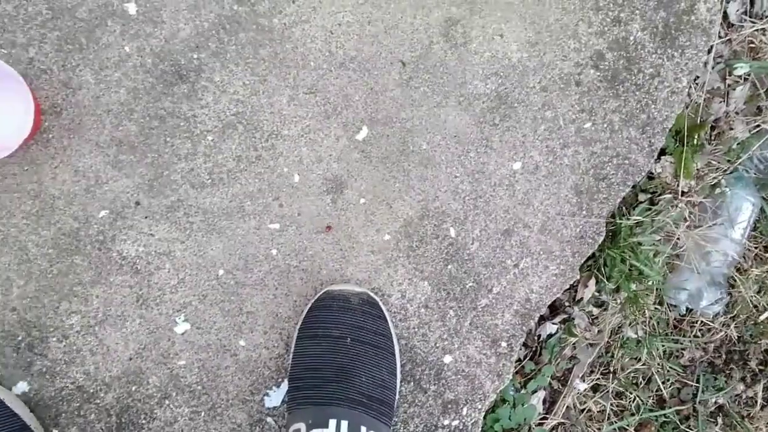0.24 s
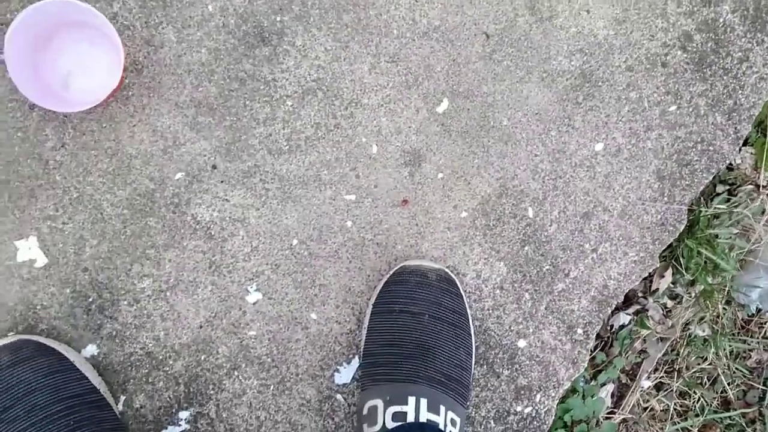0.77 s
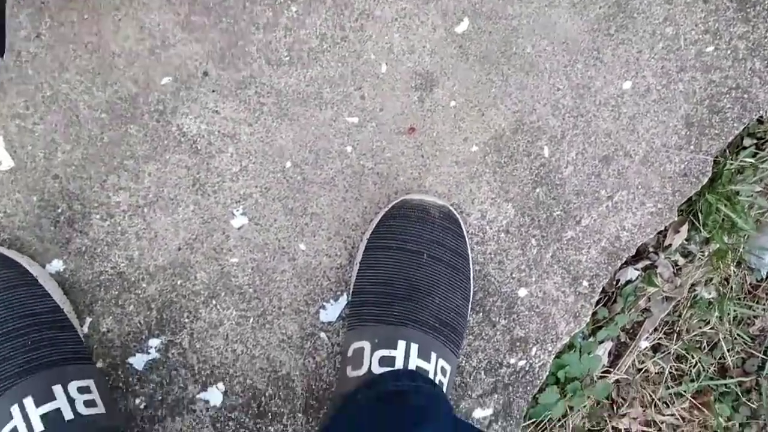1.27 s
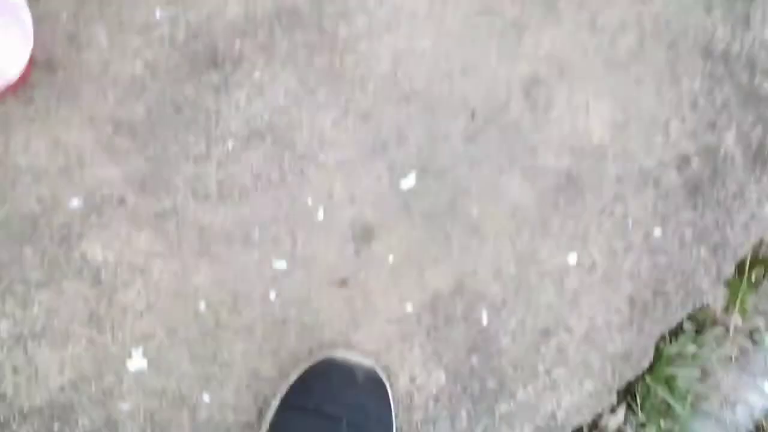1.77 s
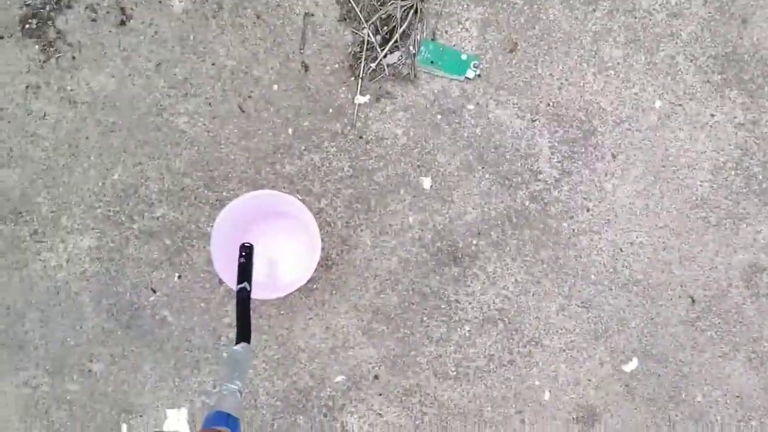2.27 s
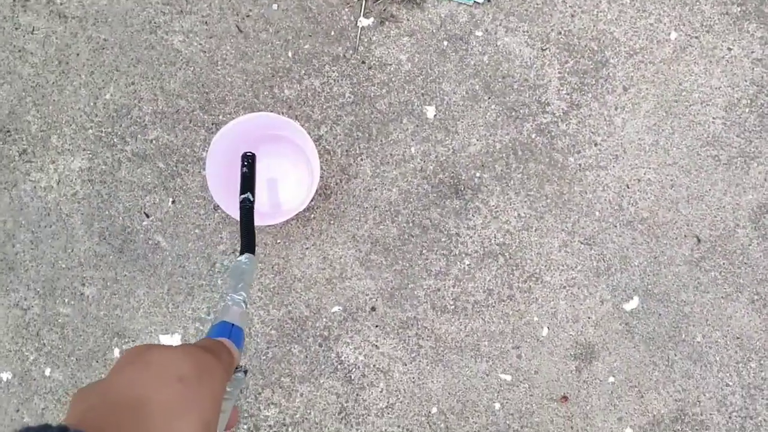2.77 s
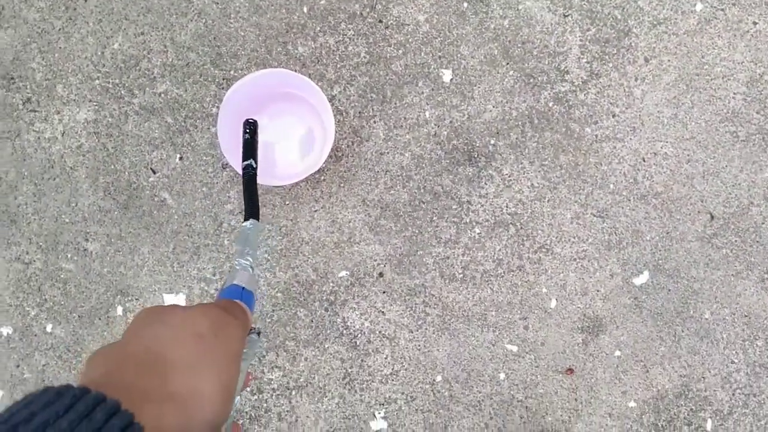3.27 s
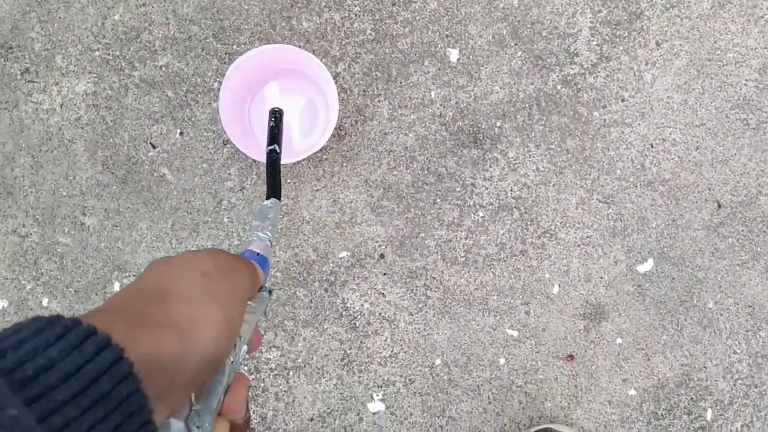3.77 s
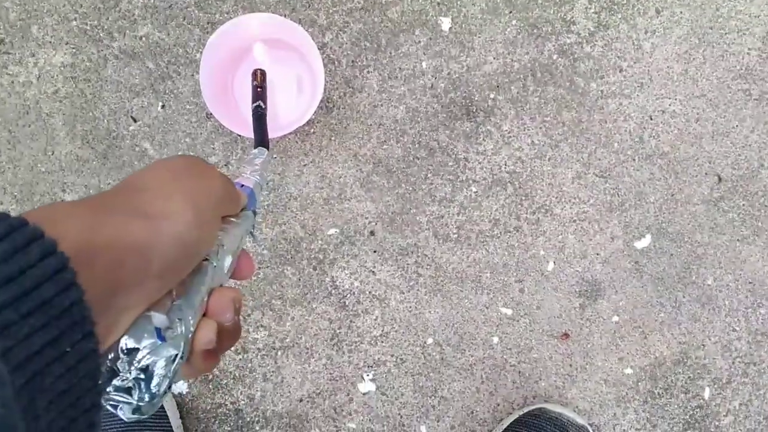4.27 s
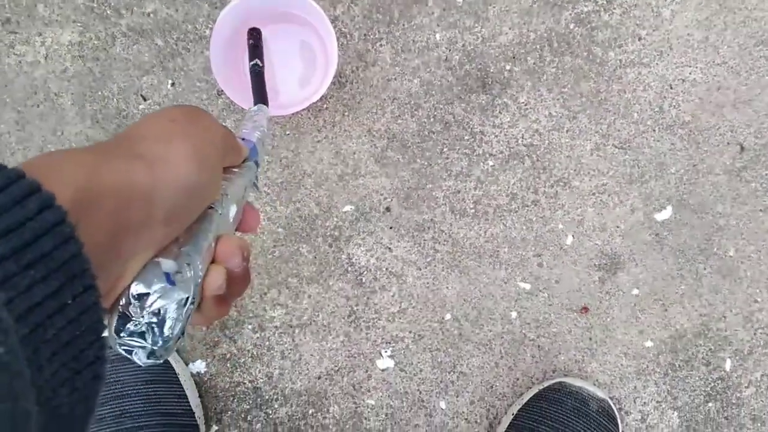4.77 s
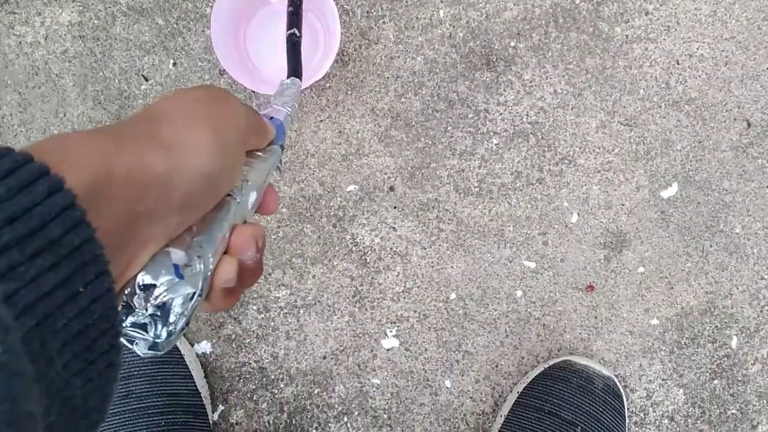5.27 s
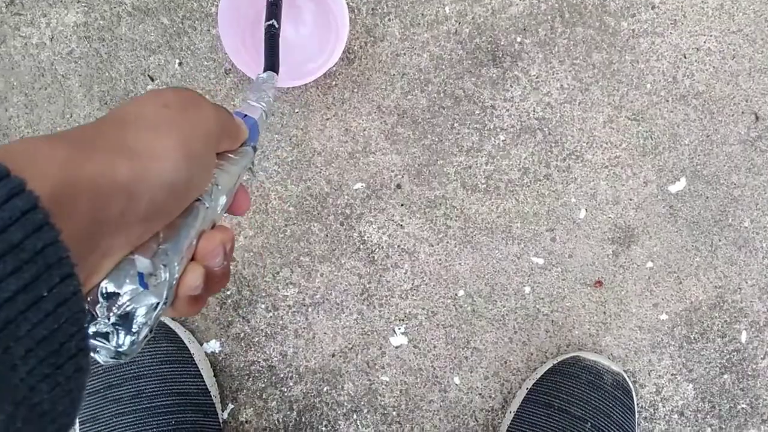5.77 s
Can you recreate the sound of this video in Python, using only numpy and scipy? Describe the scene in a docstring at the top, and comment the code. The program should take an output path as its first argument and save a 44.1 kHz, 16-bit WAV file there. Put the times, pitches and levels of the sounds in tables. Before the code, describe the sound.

A utility lighter clicks repeatedly up close with sharp plastic snaps, outdoors over a faint low rumble of distant traffic.

```python
"""Utility lighter in a concrete yard.

A long-nosed lighter is clicked close to a phone: the trigger creaks, the piezo hammer snaps and the
trigger springs back, each snap ringing the plastic case and jolting the hand. House walls echo.
Shoes shift on grit, a sleeve rustles, traffic swells and fades; faint thin high tones come and go.
The phone's limiter flattens the first instant of the loudest snaps."""
import sys
import numpy as np
from scipy import signal
from scipy.fft import rfft, irfft, next_fast_len
from scipy.io import wavfile
from scipy.ndimage import uniform_filter1d, minimum_filter1d, map_coordinates

SR = 44100
rng = np.random.default_rng(int(sys.argv[2]) if len(sys.argv) > 2 else 0)


def int16_out(signal):
    """Quantize to a 16-bit WAV file."""
    q = np.round(np.clip(np.atleast_2d(signal).T, -1, 1) * 32767)
    wavfile.write(sys.argv[1], SR, q.astype(np.int16))


N = 265923

# Far tyre hum. Each row: time in seconds, relative level in dB.
TYRE_LEVELS = [(0.0, -62.5), (0.32, -61.5), (0.91, -54.5), (1.61, -61), (2.2, -60), (2.54, -64.5),
               (3.04, -61.5), (3.27, -65.5), (3.56, -62), (3.78, -62), (4.55, -70), (5.27, -71),
               (5.48, -61), (5.61, -59.5), (6.03, -65)]
# Passing vehicles. Each row: time when nearest and half length in seconds, rumble, roar and wash in dB.
VEHICLE_PASSES = [(.97, .6, -47, -49.5, -56.5), (2.049, 0.35, -49.5, -53, -64),
                  (2.93, 0.85, -57.5, -61.5, -59), (5.68, .42, -51.5, -84, -77)]
# Traffic and background hiss spectra. Each row: frequency in Hz, relative density in dB.
TYRE_SPECTRUM = [(400, -39), (620, -24.5), (780, 2), (900, 5.5), (1040, 0.5), (1200, -11.5), (1450, -23),
                 (2500, -47.5), (6000, -89.5)]
RUMBLE_SPECTRUM = [(20, -12), (35, -15.5), (50, -8), (72, 0.5), (130, -0.5), (200, -3.5), (300, -9),
                   (380, -22), (470, -41), (900, -62.5), (4000, -100)]
ROAR_SPECTRUM = [(150, -11.5), (300, 1.5), (450, -0.5), (650, -1.5), (900, -6.5), (1300, -12.5),
                 (2500, -47.5), (6000, -92.5)]
WASH_SPECTRUM = [(500, -29), (900, -1), (1350, 1.5), (1750, -2), (2100, -7.5), (2900, -12.5), (3600, -29),
                 (7000, -32.5), (11000, -66.5)]
FLICKER_SPECTRUM = [(700, -24), (1300, 1), (1900, -8.5), (3100, -10.5), (5000, -23), (9000, -23.5),
                    (12000, -41.5)]
HISS_SPECTRUM = [(100, 0), (3000, -4.5), (8500, 4.5), (10000, -1.5), (12500, -7), (13500, -16),
                 (16000, -16.5)]
# Grit under a shoe. Each row: start in seconds, level in dB, pitch in Hz, rattle time in seconds.
GRIT_CRACKS = [(0.0848, -63.5, 9600, 0.006), (.3022, -61, 8700, 0.003), (1.1298, -49, 7200, 0.0046),
               (1.261, -45.5, 7500, 0.0025), (5.5466, -41.5, 6940, 0.0041), (5.559, -36.5, 7100, 0.0013),
               (5.6263, -39.5, 7000, 0.0019), (5.634, -42, 6600, 0.0036), (5.8118, -38.5, 7520, 0.0018)]
# Stick-slip spectrum. Each row: ratio of frequency to pitch, relative density in dB.
SLIP_SPECTRUM = [(.1, -54), (.35, -23.5), (0.531, -9), (.8, -3), (1.098, 5), (1.3, -8), (1.5, -20.5),
                 (1.847, -34), (2.199, -54.5)]
# Wall reflections. Each row: delay in seconds, gain in dB.
WALL_ECHOES = [(0.0143, -22), (0.029, -34), (0.0425, -31.5), (0.0559, -32.5), (.0603, -36.5), (0.068, -41),
               (0.0855, -37.5)]
# Yard tail colour. Each row: frequency in Hz, relative level in dB.
TAIL_SPECTRUM = [(300, -5.5), (2000, 7), (5500, 2), (8100, -4), (10000, 1), (15000, 4.5)]
# Yard tail decay. Each row: frequency in Hz, T60 in seconds.
TAIL_T60 = [(200, 0.45), (1500, 0.53), (5000, .41), (8000, .48), (12000, 0.5), (16000, .38)]
# Sleeve rubbing. Each row: frequency in Hz, relative density in dB.
CLOTH_SPECTRUM = [(2000, -20), (4500, -6.5), (8000, 0.5), (9300, -3), (10500, -20), (14000, -38.5)]
# Hammer and trigger snaps. Each row: start in seconds, level in dB, relative ring, clack and jolt in dB.
LIGHTER_SNAPS = [(1.4928, -3, -2, -3, -19), (1.7778, -18, -5, -6, -18), (2.4213, -4.5, -7.5, 1, -33.5),
                 (2.4740, -5, -2, 0, -17), (2.9859, -13.5, -8.5, 0, -32),
                 (3.1139, -20.5, -3.5, -7.5, -20.5), (3.2521, -4, -1.5, -1.5, -18)]
# Crack of a snap. Each row: frequency in Hz, relative density in dB.
CRACK_SPECTRUM = [(100, -29.5), (400, -21.5), (1000, -20.5), (1400, -13), (2200, -19), (3200, -19),
                  (4200, -13), (5700, -5), (6800, -5), (8100, 4.5), (9200, -2), (10500, -14.5),
                  (12000, -25), (15500, -31.5)]
# Plastic clack, stronger in hard strikes. Each row: frequency in Hz, multiplier of the snap's clack dB.
CLACK_WEIGHTS = [(2500, 0.5), (4200, 1.5), (6000, 1.84), (7500, 1.5)]
# Case and steel nose modes. Each row: frequency in Hz, relative level in dB, T60 in seconds.
CASE_MODES = [(1424, -23, 0.024), (1720, -27.5, 0.022), (2860, -27, 0.025), (3980, -23.5, 0.022),
              (4800, -21.5, 0.015), (5619, -15.5, 0.029), (5740, -13.5, 0.018), (6790, -14.5, 0.0059),
              (7416, -9.5, 0.02), (8090, 0, 0.027), (8820, -3, .016), (8600, -9, 0.016), (9300, -18, 0.039),
              (9480, -22, 0.022)]
# Slips in a slow press. Each row: lead in seconds, level in dB re the snap, rattle time in seconds.
CREAK_SLIPS = [(.035, -18.5, 0.0029), (0.016, -21.5, 0.0049)]
# Loose trigger ticks. Each row: start in seconds, level in dB.
TRIGGER_TICKS = [(1.8934, -53.5), (1.9921, -40.5), (2.011, -51), (3.1652, -40.5)]
# Faint high tones. Each row: start and length in seconds, pitch in Hz, mid-swell level in dB.
FAINT_TONES = [(2.598, 0.48, 9020, -75), (3.762, 0.34, 9000, -84), (5.305, 0.43, 2983, -78)]


def amp(db):
    """Decibels to gain."""
    return 10 ** (np.asarray(db) / 20)


def unit(x):
    """Scale to rms 1."""
    return x / np.sqrt(np.mean(x ** 2) + 1e-20)


def along(points, hz):
    """Interpolate (Hz, value) points on a log axis."""
    knots_hz, values = np.transpose(points)
    return np.interp(np.log(hz + 1e-6), np.log(knots_hz), values)


def wobble(rate_hz, size=N):
    """Smooth random curve with knots at rate_hz."""
    knots = rng.standard_normal(int(size * rate_hz / SR) + 4)
    return map_coordinates(knots, [np.arange(size) * rate_hz / SR])


def add(track, start_s, sound):
    """Mix a sound into the track."""
    span = track[round(start_s * SR):][:len(sound)]
    span += sound[:len(span)]


def coloured(x, spectrum):
    """Minimum-phase filter from (Hz, dB) points."""
    n_fft = 2 * next_fast_len(len(x))
    gain = amp(along(spectrum, np.fft.rfftfreq(n_fft, 1 / SR)))
    cepstrum = irfft(np.log(gain), n_fft)
    cepstrum[1:n_fft // 2] *= 2
    cepstrum[n_fft // 2 + 1:] = 0
    return irfft(rfft(x, n_fft) * np.exp(rfft(cepstrum)), n_fft)[:len(x)]


def rush(spectrum, patchy_db):
    """Coloured noise with patches of random gain; rms 1."""
    bins = signal.stft(rng.standard_normal(N), nperseg=1024)[2]
    field = uniform_filter1d(rng.standard_normal(bins.shape), size=5, axis=0)
    field = uniform_filter1d(field, size=9, axis=1)
    noise = signal.istft(bins * amp(patchy_db * unit(field)))[1][:N]
    return unit(coloured(noise, spectrum))


def flutter(spectrum, depth_db):
    """Noise flickering in narrow, short-lived bands; rms 1."""
    bins = signal.stft(rng.standard_normal(N), nperseg=1024)[2]
    field = rng.standard_normal(bins.shape)
    for _ in range(2):
        field = uniform_filter1d(uniform_filter1d(field, size=3, axis=0), size=5, axis=1)
    gain_db = depth_db * 2 * np.tanh(unit(field) / 2)
    noise = signal.istft(bins * amp(gain_db))[1][:N]
    return unit(coloured(noise, spectrum))


def tyres():
    """Far tyres hum throughout."""
    road_db = np.interp(np.arange(N) / SR, *np.transpose(TYRE_LEVELS))
    return amp(road_db + 1) * flutter(TYRE_SPECTRUM, depth_db=3.5)


def flickering_hiss():
    """Faint hiss flickers in narrow, short-lived bands."""
    return amp(-80) * flutter(FLICKER_SPECTRUM, depth_db=16)


def vehicles():
    """Engine rumble, roar and road wash swell with each pass; treble fades first with distance."""
    nearest_s, half_s, rumble_db, roar_db, wash_db = np.transpose(VEHICLE_PASSES)[:, :, None]
    distance_sq = 1 + ((np.arange(N) / SR - nearest_s) / half_s) ** 2

    def swell(db, fall_db):
        return np.linalg.norm(amp(db - fall_db * np.log10(distance_sq)), axis=0)

    rumble_floor, roar_floor = amp(-52.5), amp(-82.5)
    rumble_gain = np.hypot(swell(rumble_db, fall_db=13.5), rumble_floor) * amp(1.207 * wobble(11))
    roar_gain = np.hypot(swell(roar_db, fall_db=36), roar_floor)
    rumble = rumble_gain * rush(RUMBLE_SPECTRUM, patchy_db=2)
    roar = roar_gain * rush(ROAR_SPECTRUM, patchy_db=2.5)
    wash = swell(wash_db, fall_db=62) * flutter(WASH_SPECTRUM, depth_db=6.5)
    return rumble + roar + wash


def chatter(t, rattle_s, t60_s, spectrum):
    """Parts rattle, then settle; total energy equals rms 1 over rattle_s."""
    contacts = rng.choice([-1, 1], len(t)) * amp(-60 * np.maximum(t - rattle_s, 0) / t60_s)
    burst = coloured(contacts, spectrum)
    return burst * np.sqrt(rattle_s * SR) / np.linalg.norm(burst)


def slips(events, t60_s):
    """Surfaces stick and slip in short ticks."""
    track, t = np.zeros(N), np.arange(SR // 20) / SR
    for start_s, db, pitch_hz, rattle_s in events:
        spectrum = [(ratio * pitch_hz, level_db) for ratio, level_db in SLIP_SPECTRUM]
        add(track, start_s, amp(db) * chatter(t, rattle_s, t60_s, spectrum))
    return track


def grit(crumb_db=-16.5, mean_lag_s=0.02, crumb_s=0.001):
    """Grains crack under a sole; each sheds three crumbs."""
    crumbs = [(start_s + lag_s, db + crumb_db, hz, crumb_s)
              for start_s, db, hz, _ in GRIT_CRACKS
              for lag_s in mean_lag_s * rng.exponential(size=3)]
    return slips(list(GRIT_CRACKS) + crumbs, t60_s=0.021)


def yard_response(tail_db, build_s=0.0051):
    """Distinct wall echoes over a grainy, scattered tail."""
    scatter = rng.standard_normal(SR // 2) * amp(3 * wobble(500, size=SR // 2))
    hz, t, bins = signal.stft(scatter, SR, nperseg=256)
    gain_db = along(TAIL_SPECTRUM, hz)[:, None] - 60 * t / along(TAIL_T60, hz)[:, None]
    tail = signal.istft(bins * amp(gain_db))[1]
    tail *= 1 - np.exp(-np.arange(len(tail)) / SR / build_s)
    response = amp(tail_db) * tail / np.linalg.norm(tail)
    for delay_s, db in WALL_ECHOES:
        response[round(delay_s * SR)] += amp(db)
    return response


def yard(x, tail_db):
    """Yard reflections; the sources move, so each half second gets a new tail."""
    track, step = np.zeros(N), SR // 2
    for start in range(0, N, step):
        block = x[start:start + step]
        if block.any():
            add(track, start / SR, signal.fftconvolve(block, yard_response(tail_db)))
    return track


def sleeve(start_s, end_s, db):
    """Cloth and skin rub as the arm brings the lighter forward."""
    track, n = np.zeros(N), round((end_s - start_s) * SR)
    friction = rng.standard_normal(n) * amp(3 * wobble(300, size=n))
    envelope = amp(db + 2.5 * wobble(15, size=n)) * np.hanning(n)
    add(track, start_s, envelope * unit(coloured(friction, CLOTH_SPECTRUM)))
    return track


def snaps(rattle_s=0.0013, ring_rise_s=0.00069):
    """Sprung hammer or trigger rattles home, rings the case and jolts the hand."""
    track, t = np.zeros(N), np.arange(SR // 10) / SR
    for start_s, db, ring_db, clack_db, jolt_db in LIGHTER_SNAPS:
        spectrum = [(hz, band_db + clack_db * along(CLACK_WEIGHTS, hz))
                    for hz, band_db in CRACK_SPECTRUM]
        crack = chatter(t, rattle_s, t60_s=0.018, spectrum=spectrum)
        ring = np.zeros(len(t))
        for hz, mode_db, t60_s in CASE_MODES:
            envelope = amp(mode_db + rng.normal(0, 1) - 60 * t / t60_s)
            ring += envelope * np.sin(2 * np.pi * (hz * t + rng.random()))
        snap = crack + amp(ring_db - 0.5) * ring * (1 - np.exp(-t / ring_rise_s))
        snap *= np.sqrt(rattle_s * SR) / np.linalg.norm(snap)
        thump = amp(jolt_db) * jolt(t, start_hz=194, end_hz=75.6, t60_s=0.051)
        add(track, start_s, amp(db) * (snap + thump))
    return track


def jolt(t, start_hz, end_hz, t60_s, glide_s=0.0042):
    """A push through the hand, slowing as the flesh takes it up."""
    hz = end_hz + (start_hz - end_hz) * np.exp(-t / glide_s)
    return -np.sin(2 * np.pi * np.cumsum(hz) / SR) * amp(-60 * t / t60_s)


def trigger(pitch_hz=7500, tick_s=0.0054, slow_press_db=-10):
    """Trigger creaks before the soft snap of a slow press and ticks as the finger eases."""
    creaks = [(snap_s - lead_s, snap_db + db, pitch_hz, rattle_s)
              for snap_s, snap_db, *_ in LIGHTER_SNAPS if snap_db < slow_press_db
              for lead_s, db, rattle_s in CREAK_SLIPS]
    ticks = [(start_s, db, pitch_hz, tick_s) for start_s, db in TRIGGER_TICKS]
    return slips(creaks + ticks, t60_s=0.013)


def hand_bump(start_s, db, rise_s=0.0035):
    """The hand knocks softly on the phone: a push and a dull rub."""
    track, t = np.zeros(N), np.arange(SR // 10) / SR
    push = jolt(t, start_hz=130, end_hz=117, t60_s=0.036) * (1 - np.exp(-t / rise_s))
    rub = chatter(t, rattle_s=0.0038, t60_s=0.18,
                  spectrum=[(60, -15), (200, -7), (500, -9.5), (1500, -20), (6000, -44)])
    add(track, start_s, amp(db) * (push + amp(-14.5) * rub))
    return track


def faint_tones(bandwidth_ratio=0.02):
    """Thin, unsteady high tones swell and fade."""
    track = np.zeros(N)
    for start_s, length_s, hz, db in FAINT_TONES:
        t = np.arange(round(length_s * SR)) / SR
        tone = unit(wobble(bandwidth_ratio * hz, size=len(t)) * np.sin(2 * np.pi * hz * t))
        add(track, start_s, amp(db) * np.sin(np.pi * t / length_s) * tone)
    return track


def scene():
    """Mono mix: lighter near and fairly dry, shoes farther off with more yard tail."""
    background = tyres() + flickering_hiss() + vehicles()
    background += amp(-85.5) * rush(HISS_SPECTRUM, patchy_db=3.4) + faint_tones()
    rustle = sleeve(start_s=0.75, end_s=2.2, db=-71)
    lighter, shoes = snaps() + trigger(), grit()
    near = lighter + yard(lighter, tail_db=-18.5) + hand_bump(start_s=1.7935, db=-22.5) + rustle
    far = shoes + yard(shoes, tail_db=-5.5)
    return (near + far + background)[None]


def limiter(x, ceiling, window_samples):
    """Gain ducks smoothly around each peak above the ceiling."""
    needed_gain = ceiling / np.maximum(np.abs(x), ceiling)
    return x * uniform_filter1d(minimum_filter1d(needed_gain, window_samples), window_samples)


def record(dry):
    """Phone: bass cut, peak limiter, band limit."""
    low_hz, top_hz, edge_hz = 38, 15900, 600
    highpassed = signal.sosfilt(signal.butter(2, low_hz, "highpass", fs=SR, output="sos"), dry)
    limited = limiter(highpassed, ceiling=0.92, window_samples=25)
    n_fft = next_fast_len(N + SR // 2)
    passband = np.clip((top_hz - np.fft.rfftfreq(n_fft, 1 / SR)) / edge_hz + 0.5, 0, 1)
    return irfft(rfft(limited, n_fft) * passband ** 2, n_fft)[:, :N]


dry = scene()
out = record(dry)
int16_out(out)
```